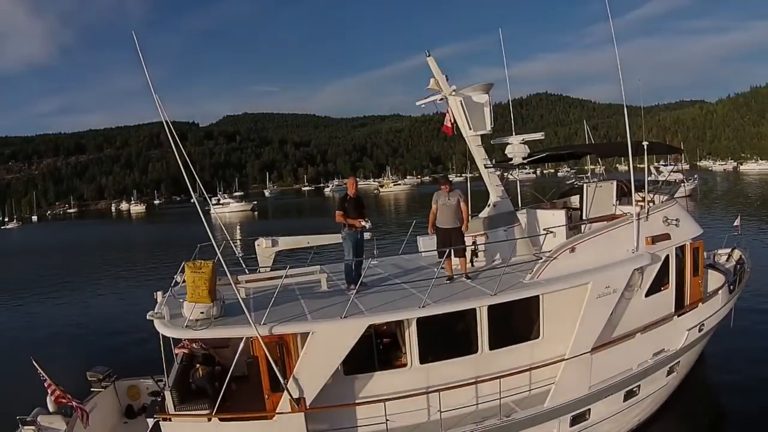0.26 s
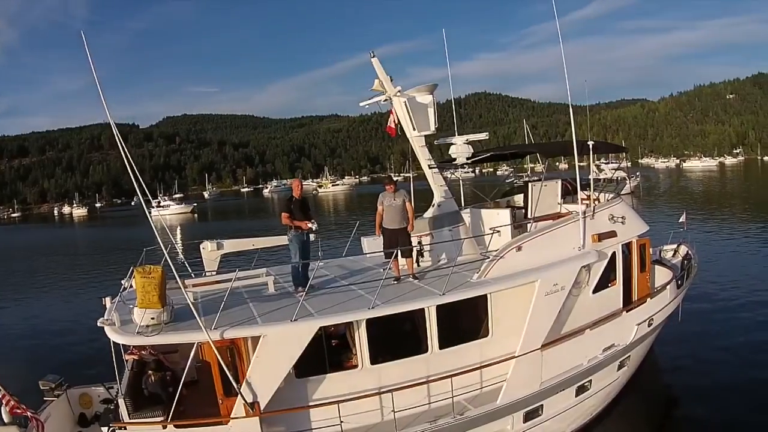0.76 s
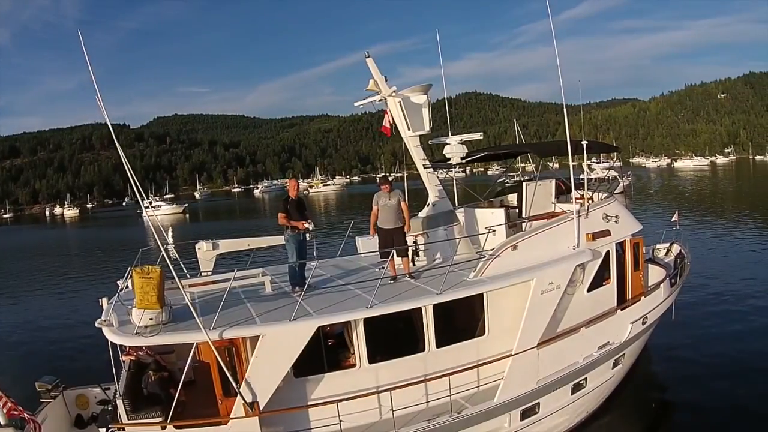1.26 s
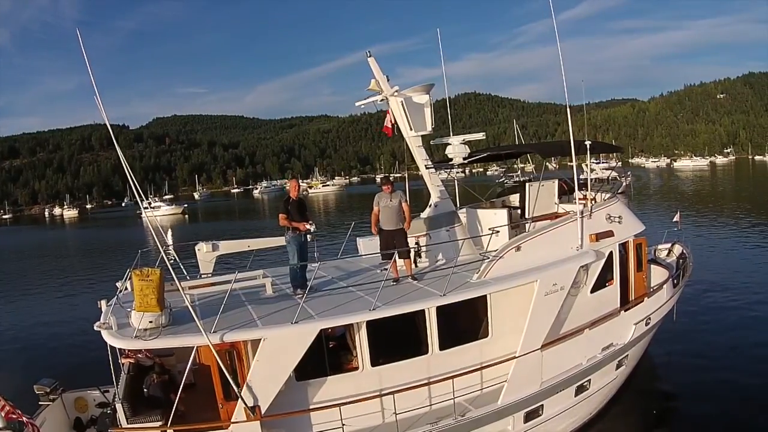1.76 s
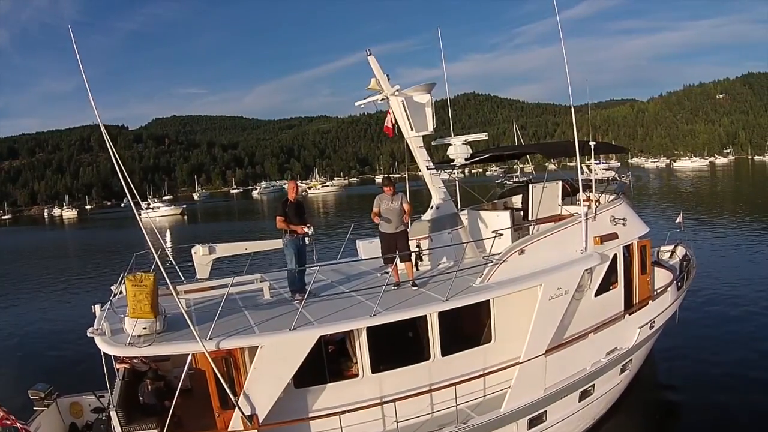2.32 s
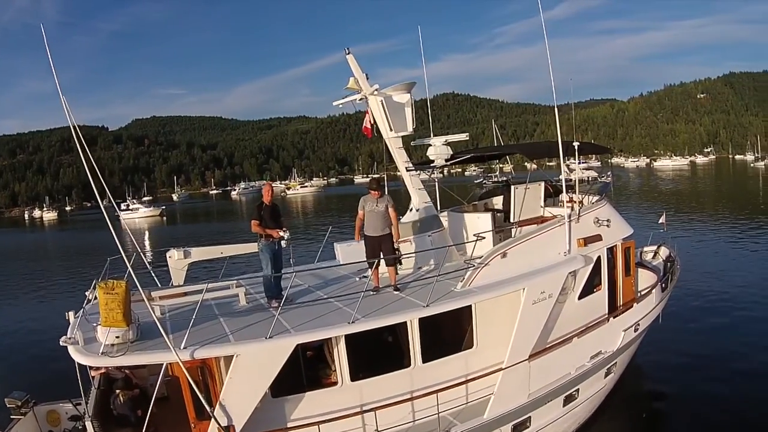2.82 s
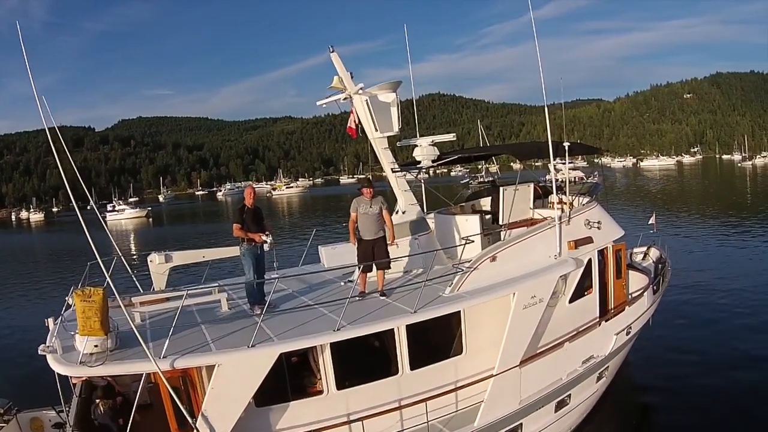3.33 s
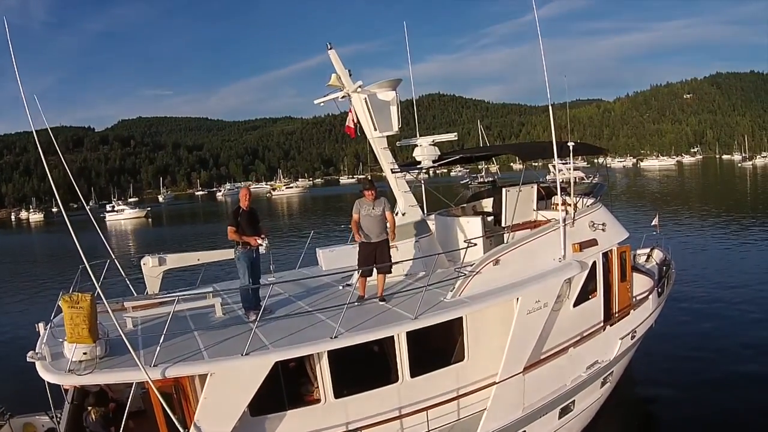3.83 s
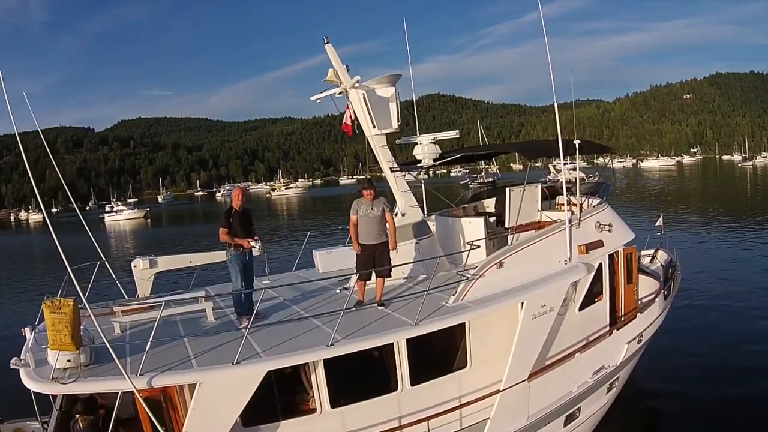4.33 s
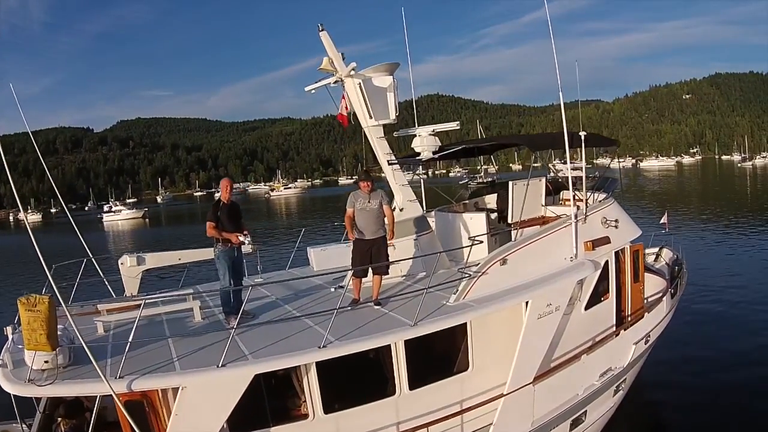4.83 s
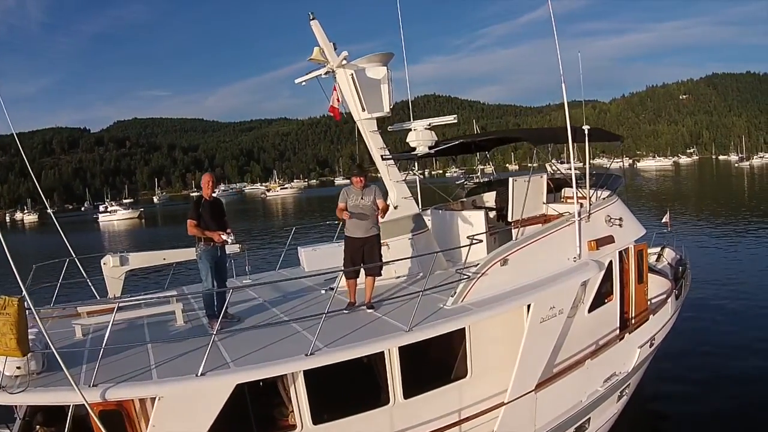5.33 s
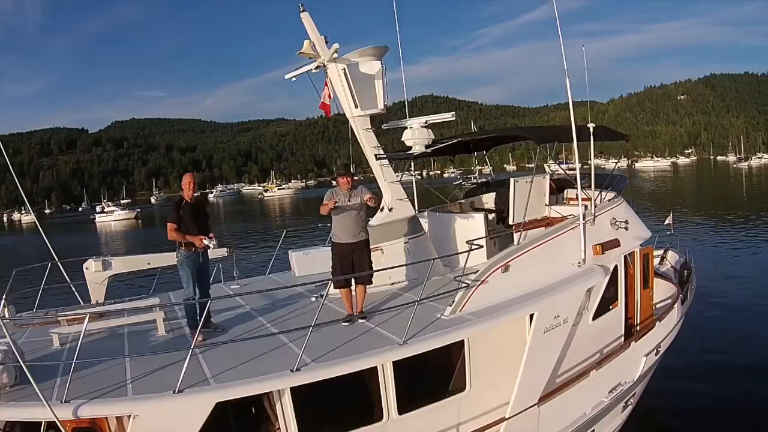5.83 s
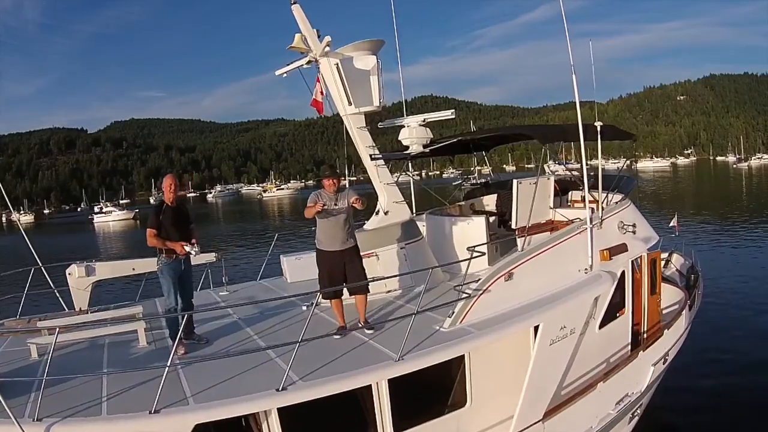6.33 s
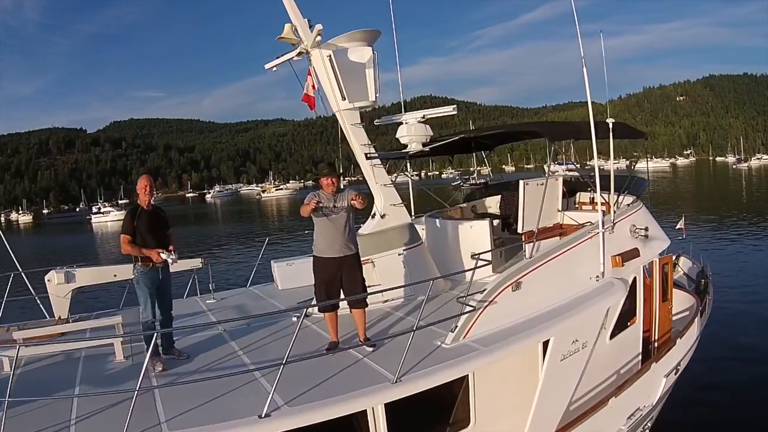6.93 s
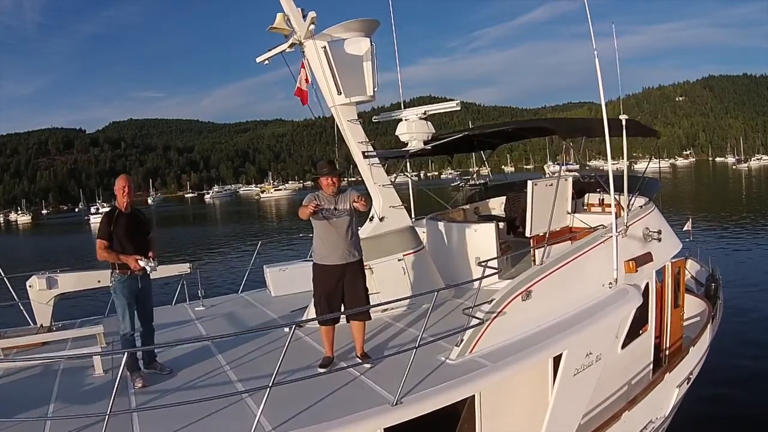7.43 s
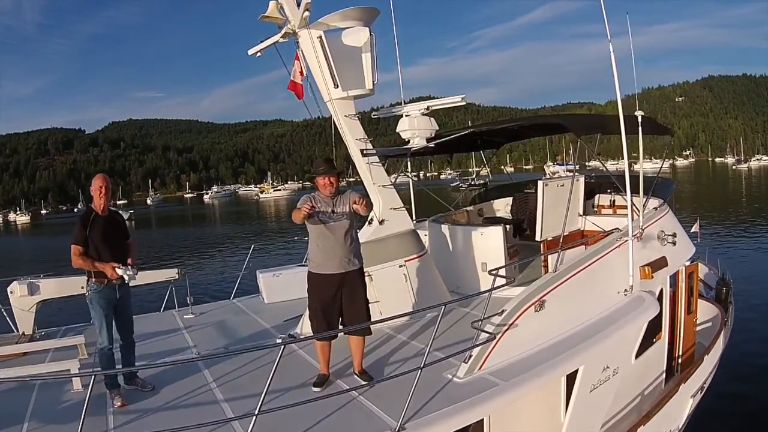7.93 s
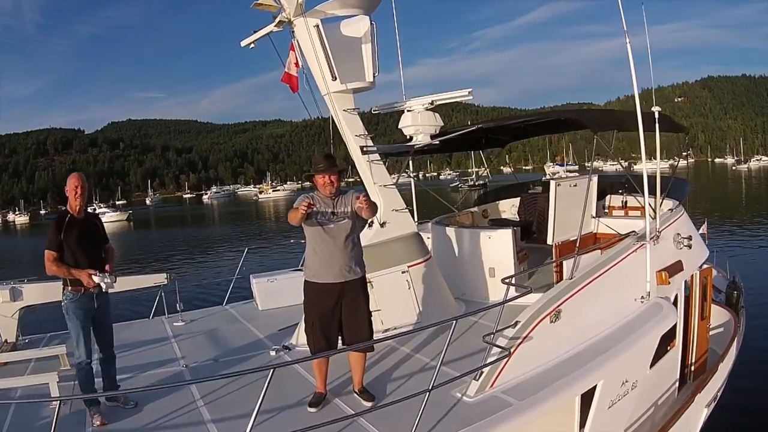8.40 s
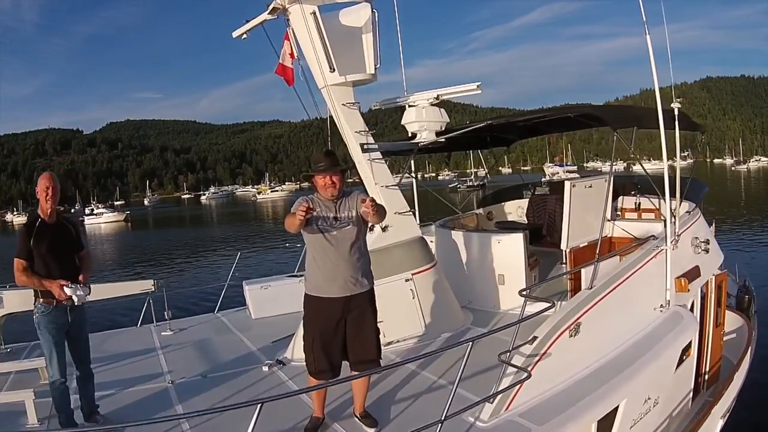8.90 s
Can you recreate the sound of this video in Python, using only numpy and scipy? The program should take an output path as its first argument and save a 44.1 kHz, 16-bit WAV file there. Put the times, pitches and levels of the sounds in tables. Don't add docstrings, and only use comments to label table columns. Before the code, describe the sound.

After a short silence, a two-blade helicopter hovers steadily, chopping about eleven times a second over windy wash, rumble and faint high whine.

```python
import sys
import numpy as np
from scipy import signal
from scipy.fft import rfft, irfft, next_fast_len
from scipy.io import wavfile
from scipy.ndimage import uniform_filter1d

SR = 44100
rng = np.random.default_rng(int(sys.argv[2]) if len(sys.argv) > 2 else 0)


def volts_from_decibels(level):
    exponent = np.asarray(level, float) / 20
    return 10 ** exponent


def unload_audio(sound):
    columns = np.transpose(np.atleast_2d(sound))
    steps = np.round(np.clip(columns, -1, 1) * 32767)
    wavfile.write(sys.argv[1], SR, steps.astype(np.int16))


N = 403956
PASSES = 89
BEFORE, LENGTH = 1536, 5120


def rms_one(x):
    return x / np.sqrt(np.mean(x ** 2, axis=-1, keepdims=True) + 1e-20)


def in_time(rows):
    s, *columns = np.transpose(rows)
    return [np.interp(np.arange(N) / SR, s, c) for c in columns]


def colour(x, points):
    hz, db = np.transpose(points)
    bins_hz = np.fft.rfftfreq(x.shape[-1], 1 / SR) + 1
    gain = volts_from_decibels(np.interp(np.log(bins_hz), np.log(hz), db, left=-90, right=-90))
    return irfft(rfft(x) * gain, x.shape[-1])


def noise(points):
    return rms_one(colour(rng.standard_normal(next_fast_len(N)), points)[:N])


def drift(rate_hz):
    r = np.exp(-32 * np.pi * rate_hz / SR)
    slow = signal.lfilter([1], [1, -2 * r, r * r], rng.standard_normal(N // 16 + 3002))[3000:]
    return np.interp(np.arange(N) / 16, np.arange(len(slow)), rms_one(slow))


def whistle(hz, width_hz):
    phase = 2 * np.pi * np.cumsum(hz * np.ones(N)) / SR
    return drift(width_hz) * np.sin(phase) + drift(width_hz) * np.cos(phase)


def at_passes(shapes, times_s):
    out = np.zeros(N + LENGTH + BEFORE)
    for s, shape in zip(times_s.ravel(), np.broadcast_to(shapes, (PASSES, LENGTH))):
        start = round(s * SR)
        out[start:start + LENGTH] += shape
    return out[BEFORE:BEFORE + N]


def as_level(shapes, db):
    return rms_one(shapes) * volts_from_decibels(db) * np.sqrt(.01 * SR / LENGTH)


def swell(ms, rise_ms, fall_ms):
    hump = 1 / (np.exp(-ms / rise_ms) + np.exp(ms / fall_ms))
    return hump / hump.max(axis=-1, keepdims=True)


def split_ms(spread_ms):
    return np.clip(1.9 * (spread_ms - 2.6), 0, 9)


def passes():
    # (time [s], lateness [ms], crack level [dB], crack centre [Hz], spread [ms], thump
    # level [dB])
    slap_course = [(.85, 0, -34.5, 1190, 2.4, -33.5), (1.3, 0, -31.5, 1780, 1.4, -25),
                   (1.75, 1, -33.5, 880, 2.54, -25), (2.3, -1.5, -33, 1280, 1.3, -24.5),
                   (2.6, -2.5, -34.5, 1010, 1.7, -23.5), (2.999, -2, -37, 1230, 2.7, -29.5),
                   (3.35, -5.5, -33, 1180, 2.2, -32.5), (3.699, -6.5, -35.5, 870, 1.8, -28),
                   (4.0, -3, -40.5, 1470, 4.64, -29.5), (4.401, -6, -32.5, 930, 2.64, -33),
                   (4.75, -1, -36, 1290, 6.2, -27), (5.9, -3.5, -36.5, 1150, 7.4, -30),
                   (6.4, -4, -36.5, 1160, 3.24, -28.5), (6.7, -1, -33.5, 1460, 0.64, -28.5),
                   (7.2, -1, -33, 1330, 1.93, -29.5), (7.85, -2, -33.5, 1300, 1.74, -30),
                   (8.4, 0, -31, 1610, 1.7, -22), (9.1, 0.5, -33, 905, 1.8, -26.5)]
    # (time [s], crack gain [dB], thump gain [dB], spread factor [1])
    accents = [(1.41, 0.5, 1.5, 0.39), (1.69, 0, 5, 0.91), (2.16, 1.5, -1.5, 0.95), (2.34, 2, 1.5, 1),
               (2.44, 1.5, 1.5, 0.64), (2.72, 3.5, 1, 1.1), (3.27, 0.5, -1.5, 1), (3.83, -0.5, 1, 1.08),
               (4.11, -2, -4.5, 1.05), (4.39, 0.5, -0.5, 0.46), (4.86, 1, 0.5, 0.56), (5.42, -1, 0, 0.71),
               (6.08, -0.5, -4, 1.03), (6.27, 3, 0, 0.5), (6.45, -3.5, -2, 1.9), (6.55, 1.5, -4, 0.62),
               (6.83, -3, 2, 1.9), (7.11, 2.5, -3, 1), (7.2, 1.5, -3.5, 0.55), (7.48, 2, 4, 1),
               (7.57, -1, -7, 0.93), (8.13, 3, -3, 0.62), (8.6, 0.5, 2.5, 1.2), (8.79, -1, 1, 1.7)]
    # (lateness [quarter spreads], crack level [dB], log crack centre [1],
    # log slap spread [1], thump level [dB], log thump pitch [1])
    scatter = [.8, .6, .09, .12, 1.0, .1]
    first_pass_s, pass_s, thump_hz = .851, .0934, 200.6
    beat_s = first_pass_s + pass_s * np.arange(PASSES)
    s, *columns = np.transpose(slap_course)
    late_ms, crack_db, crack_hz, spread_ms, thump_db = (np.interp(beat_s, s, c) for c in columns)
    for at_s, crack_more_db, thump_more_db, factor in accents:
        k = np.argmin(np.abs(beat_s - at_s))
        crack_db[k] += crack_more_db
        thump_db[k] += thump_more_db
        spread_ms[k] *= factor
    chance = (rng.standard_normal((PASSES, 6)) * scatter).T
    jitter_ms = chance[0] * spread_ms / 4
    columns = [beat_s + (late_ms + jitter_ms) / 1000,
               crack_db + chance[1],
               crack_hz * np.exp(chance[2]),
               np.clip(spread_ms, .5, 9) * np.exp(chance[3]),
               thump_db + chance[4],
               thump_hz * np.exp(chance[5]),
               jitter_ms]
    return np.array(columns)[:, :, None]


def cracks(ms, db, hz, spread_ms):
    # (frequency [Hz], level [dB])
    crack_colour = [(350, -19), (600, -0.5), (1200, -2), (2200, -5), (3500, -13.5), (6000, -24.5),
                    (10000, -38), (16000, -48)]
    gap_ms, width_ms = split_ms(spread_ms), np.minimum(spread_ms, 3.5)
    core = sum(swell(ms + side * gap_ms + 0.82 * width_ms, rise_ms=0.59 * width_ms, fall_ms=1.83 * width_ms)
               for side in (-1, 1))
    rush = volts_from_decibels(-5.0) * swell(ms, rise_ms=5.3 + 1.33 * spread_ms, fall_ms=6.5 + .5 * spread_ms)
    rush = rush + volts_from_decibels(-3) * (np.abs(ms) < gap_ms)
    grit = rng.standard_normal((len(db), LENGTH))
    lumps = uniform_filter1d(uniform_filter1d(rng.standard_normal(grit.shape), size=36), size=36)
    grit = grit * volts_from_decibels(3.5 * rms_one(lumps))
    octaves = np.log2((np.fft.rfftfreq(LENGTH, 1 / SR) + 1) / hz)
    peak_db = 8.64 * np.exp(-.5 * (octaves / 0.86) ** 2)
    bright_db = 0.13 * gap_ms * np.clip(octaves, 0, 2)
    body = irfft(rfft(colour((core + rush) * grit, crack_colour)) * volts_from_decibels(peak_db + bright_db), LENGTH)
    snap = np.diff(grit * swell(ms, rise_ms=.6, fall_ms=1.2), prepend=0)
    snap_db = db - 44 - 3.0 * spread_ms + rng.normal(0, 7.0, (len(db), 1))
    return as_level(body, db + .5) + as_level(snap, snap_db)


def thumps(ms, db, hz, spread_ms, late_ms):
    # (frequency [Hz], level [dB])
    puff_colour = [(110, -11.5), (150, -2.5), (220, -2), (330, -3), (450, -14), (600, -26)]
    turn = np.cumsum(rng.normal(0, 1, (len(db), 3)) * [.6, .3, .3], axis=0)
    gap_ms, even_ms = split_ms(spread_ms), ms + late_ms
    cycles = hz * ms / 1000 * (1.1 - ms / 70)
    hump = sum(swell(ms + side * gap_ms - .8, rise_ms=1.0, fall_ms=3.8) for side in (-1, 1))
    tone = hump * np.sin(2 * np.pi * cycles + turn[:, :1])
    puff = swell(ms, rise_ms=4 + 0.9 * spread_ms, fall_ms=5.9) * rng.standard_normal((len(db), LENGTH))
    puff = colour(puff, puff_colour)
    push_hz, boom_hz = 108, 74
    push = np.sin(2 * np.pi * push_hz * even_ms / 1000 + turn[:, 1:2])
    push = push * swell(even_ms - 8, rise_ms=2.16, fall_ms=3.7)
    boom = np.sin(2 * np.pi * boom_hz * even_ms / 1000 + turn[:, 2:])
    boom = boom * swell(even_ms - 10, rise_ms=9.4, fall_ms=24.0)
    surge_db = 4.5 * np.cos(2 * np.pi * (np.arange(len(db))[:, None] - 38.6) / 10.4)
    slap_air = as_level(tone, db - 3.5) + as_level(puff, db - 4)
    return slap_air + as_level(push, db - 10.0) + as_level(boom, surge_db - 40.0)


def throb(ms, times_s):
    # (time [s], gain [dB], half length [s])
    swings = [(1.646, 8, .2), (2.25, 0, 0.091), (3.103, 12, .13), (3.498, 5.5, .1), (4.504, 5.5, .2),
              (5.098, 6.5, .1), (5.603, 11.5, .2), (6.794, 13, 0.11), (7.5, 9, 0.066), (7.748, 11, .13),
              (8.303, 3, 0.091), (8.997, 6.5, 0.18)]
    # (frequency [Hz], level [dB])
    wide_colour = [(30, 5), (50, -9), (80, -17), (120, -15), (250, -32.5), (450, -44)]
    throb_hz = 45.0
    s = np.arange(N) / SR
    swing_db = sum(db * np.exp(-((s - at_s) / half_s) ** 2) for at_s, db, half_s in swings)
    apart_db = -36 - .3 * swing_db + 0.98 * drift(1.4)
    alike_db = -49 + swing_db
    beat = rms_one(0.5 + at_passes(swell(ms - 12, rise_ms=3.6, fall_ms=12.0), times_s))
    phase = 2 * np.pi * throb_hz * s
    apart = np.sqrt(2) * np.sin(phase + 1.3 * drift(1.14)) + volts_from_decibels(-6.5) * noise(wide_colour)
    alike = np.sqrt(2) * np.cos(phase + 0.72 * drift(1.37))
    return beat * (volts_from_decibels(alike_db) * alike + volts_from_decibels(apart_db - 2.5) * apart * [[1], [-1]])


def tail_rotor():
    # (multiple [1], level [dB])
    harmonics = [(2, 0.5), (3, -0.5), (4, -1), (5, -3.5), (6, -11), (7, -10), (8, -13.5), (9, -17.5),
                 (11, -36)]
    tail_hz = 54.7
    phase = 2 * np.pi * np.cumsum(tail_hz * (1 + 0.00408 * drift(1.494))) / SR
    lines = sum(volts_from_decibels(db + 2.86 * drift(4.4)) * np.cos(k * phase + 0.65 * drift(4.0)) for k, db in harmonics)
    return rms_one(lines), np.exp(7.0 * (np.cos(phase + 1.6 * drift(30)) - 1))


def downwash(wash_db, chop, beat):
    # (frequency [Hz], level [dB])
    air_colour = [(250, -75), (420, -3.5), (560, -9), (704, -0.5), (948, -4.5), (1090, -2), (1750, -1),
                  (4500, -16), (5850, -23.5), (9900, -120)]
    air = noise(air_colour)
    dull = signal.sosfilt(signal.butter(2, 1100, fs=SR, output="sos"), air)
    air = volts_from_decibels(1.8 * drift(16)) * dull + volts_from_decibels(1.3 * drift(9.2)) * (air - dull)
    return volts_from_decibels(wash_db - 1.27) * air * (1 + 1.17 * np.clip(chop, 0, 2) * (beat - .2))


def low_rumble(effort_db, lines, swish):
    # (frequency [Hz], level [dB])
    rumble_colour = [(30, -22), (60, 0.5), (110, -5), (200, -1.5), (330, -7.5), (450, -17.5), (600, -20.5)]
    rumble = volts_from_decibels(4.1 * drift(14.0)) * noise(rumble_colour) + volts_from_decibels(2.0) * lines
    return volts_from_decibels(-44.5 + effort_db - 4.0) * rumble * (1 + 0.39 * (swish - .4))


def exhaust_hiss(swing_db, swish):
    # (frequency [Hz], level [dB])
    hiss_colour = [(3000, 7), (4500, 2), (5600, 3.5), (6300, -1.5), (7400, 3.5), (8600, -4), (10000, -5),
                   (12000, -9.5), (14000, -25), (14800, -17), (16000, -22)]
    # (pitch [Hz], width [Hz], level [dB])
    gear_lines = [
        (5660, 50, -88),
        (7350, 16, -98),
        (6800, 40, -92),
    ]
    hiss_db = -69 + 0.42 * swing_db
    hiss = noise(hiss_colour)
    top = signal.sosfilt(signal.butter(4, 9600, "high", fs=SR, output="sos"), hiss)
    gears = sum(volts_from_decibels(db + 70) * whistle(hz, width_hz) for hz, width_hz, db in gear_lines)
    return volts_from_decibels(hiss_db + 3.5) * (hiss + (3.46 * swish - .55) * top + gears)


def wash(ms, times_s):
    # (time [s], strength [dB], tail rotor chop [0-1], tail rotor effort [dB])
    strength = [(.85, -55.5, 0.8, -1), (1.6, -56, 1, -1.5), (2.1, -53.5, 0.98, 1.5), (2.6, -53, 0.7, 1.5),
                (3.2, -52.5, 0.86, -3.5), (3.9, -52, 0.45, 1), (4.6, -51, 1, 1), (5.3, -53.5, 0.34, -1.5),
                (5.9, -54.5, .3, 1), (6.4, -53, 0, -2), (7.3, -55.5, .3, 0), (7.8, -55, 1, 0),
                (8.7, -55.5, .6, -1), (9.16, -51.5, 1, 2)]
    wash_db, chop, effort_db = in_time(strength)
    lines, beat = tail_rotor()
    swish = at_passes(swell(ms - 10, rise_ms=13.4, fall_ms=21.0), times_s)
    hiss = exhaust_hiss(wash_db - wash_db.mean(), swish)
    return downwash(wash_db, chop, beat) + low_rumble(effort_db, lines, swish) + hiss


def whine():
    # (time [s], pitch [Hz], level [dB], half-pitch line [dB])
    first_whine = [(.85, 8980, -82, -8), (1.7, 9050, -80, -6), (2.7, 9070, -79, -6), (3.3, 9045, -77, -3),
                   (3.76, 9030, -79.5, -7), (3.87, 9030, -78.5, 6), (4.05, 9035, -78.5, -6),
                   (5.1, 9110, -76.5, -8), (5.9, 9130, -83, -12), (6.6, 9145, -82, -10), (6.8, 9145, -92, -10)]
    # (time [s], pitch [Hz], level [dB], half-pitch line
    # [dB])
    second_whine = [
        (4.1, 8740, -90, -12),
        (5.5, 8860, -80, -14),
        (6.3, 8860, -80.5, -12),
        (6.9, 8840, -80, -10),
        (7.25, 8875, -77, -8),
        (8.1, 8990, -78, -6),
        (9.16, 9085, -79, -9),
    ]
    out, s = 0, np.arange(N) / SR
    for rows in first_whine, second_whine:
        hz, db, half_db = in_time(rows)
        on = np.clip(np.minimum(s - rows[0][0], rows[-1][0] + .1 - s) / 0.045, 0, 1)
        line = whistle(hz, 40) + volts_from_decibels(-2.5) * whistle(hz, 210)
        half = np.sin(np.pi * np.cumsum(hz) / SR + 1.5 * drift(8))
        half = volts_from_decibels(half_db + 2.5 + 2.0 * drift(5)) * half
        apart = volts_from_decibels(-11 + 2.0 * drift(10.0)) * whistle(hz, 50) * [[1], [-1]]
        out = out + on * volts_from_decibels(db + 7.5) * (line + half + apart)
    return out


def scene():
    ms = (np.arange(LENGTH) - BEFORE) * 1000 / SR
    times_s, crack_db, crack_hz, spread_ms, thump_db, thump_hz, late_ms = passes()
    crack = cracks(ms, crack_db, crack_hz, spread_ms)
    thump = thumps(ms, thump_db, thump_hz, spread_ms, late_ms)
    lean = rng.normal(0, 1, (PASSES, 2))
    slant = volts_from_decibels(-30) * lean[:, :1] * np.roll(crack, 9, axis=1)
    slant = slant + volts_from_decibels(-23 + 2.0 * lean[:, 1:]) * np.roll(thump, 50, axis=1)
    slaps = at_passes(crack + thump, times_s) + at_passes(slant, times_s) * [[1], [-1]]
    fade_start_s, fade_s = 0.82, 0.84
    fade = np.clip((np.arange(N) / SR - fade_start_s) / fade_s, 0, 1)
    return fade * (slaps + throb(ms, times_s) + wash(ms, times_s) + whine())


def roll_off(x):
    return signal.sosfilt(signal.butter(12, 15910, fs=SR, output="sos"), x)


def record(dry):
    limited = .17 * np.tanh(dry / 0.16)
    top_cut = signal.ellip(10, .3, 60, 15720, fs=SR, output="sos")
    mix = signal.sosfilt(top_cut, limited + 1e-18)
    return roll_off(mix)


dry = scene()
out = record(dry)
unload_audio(out)
```